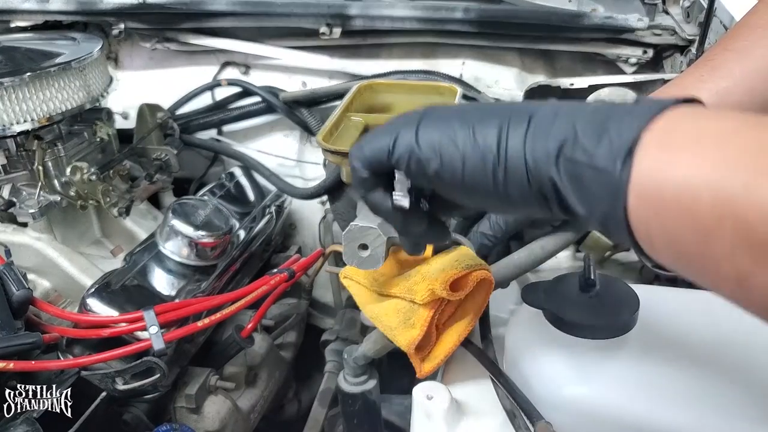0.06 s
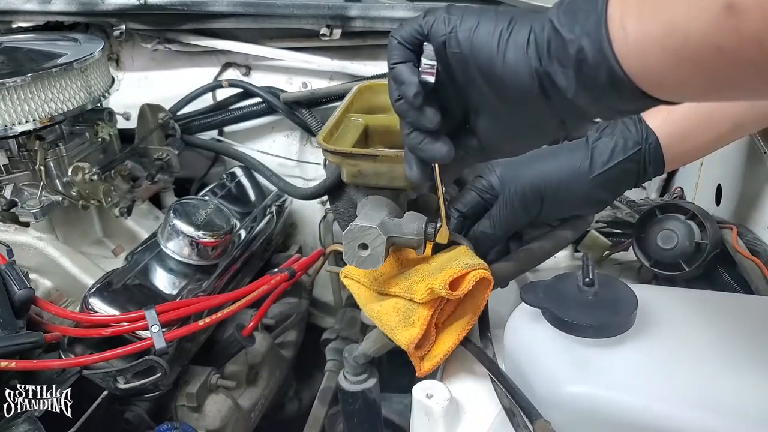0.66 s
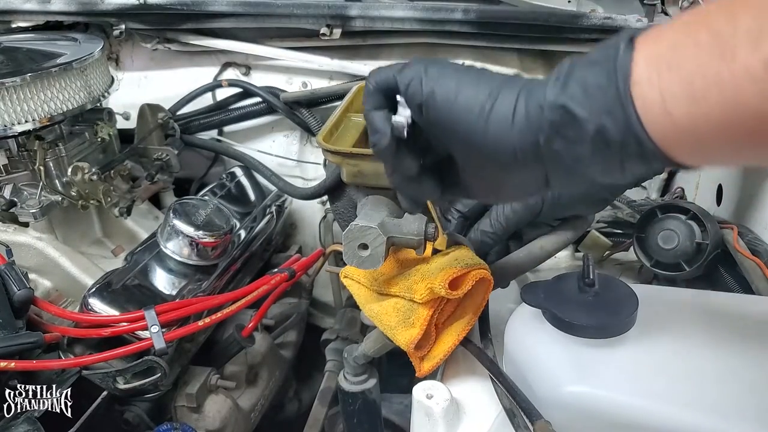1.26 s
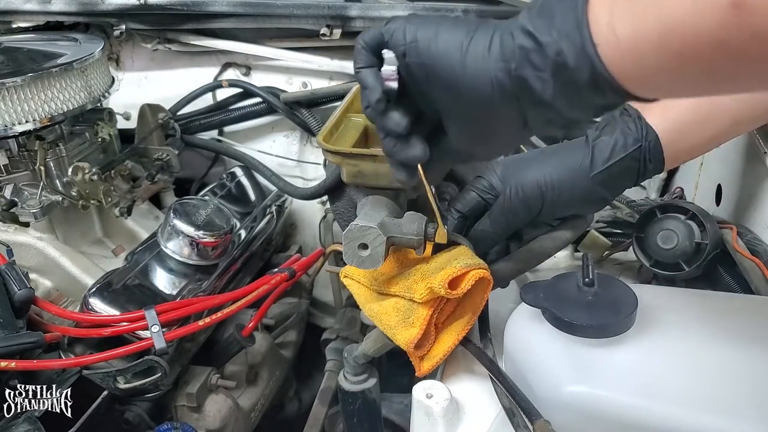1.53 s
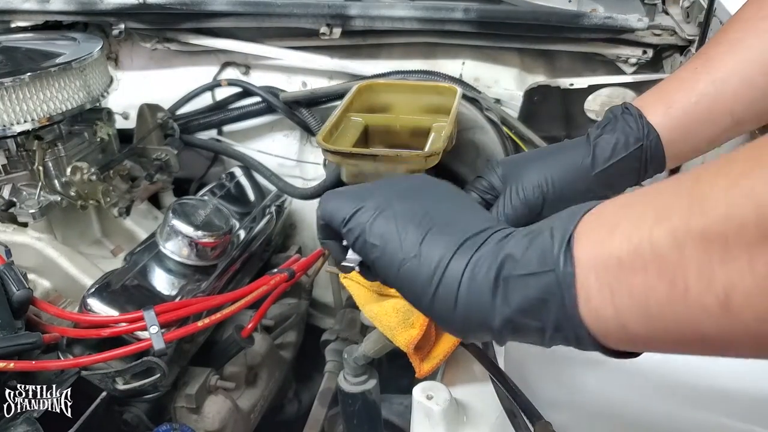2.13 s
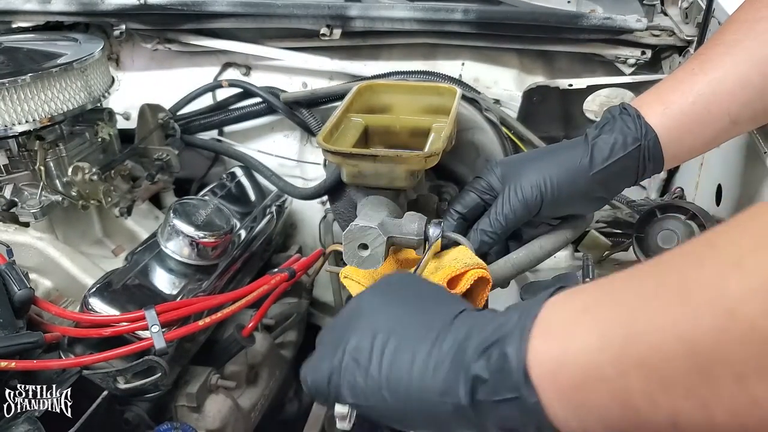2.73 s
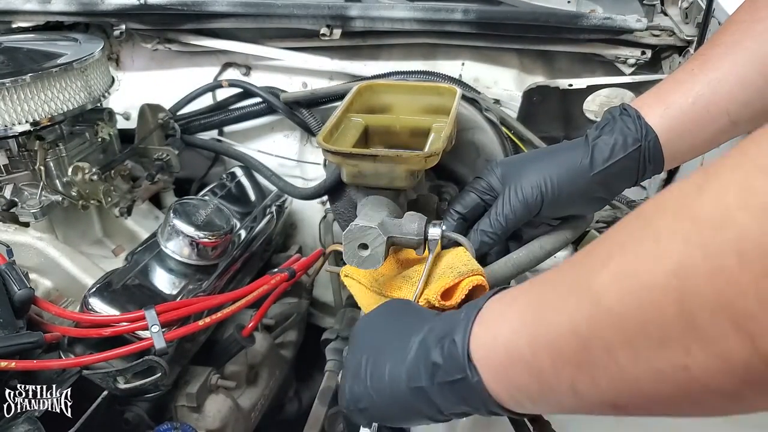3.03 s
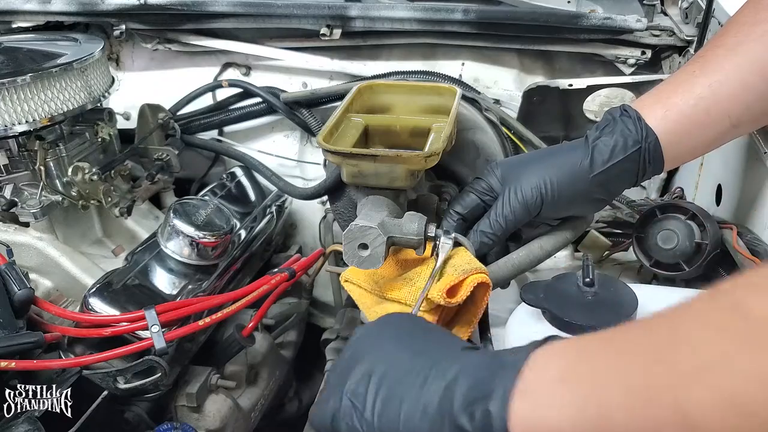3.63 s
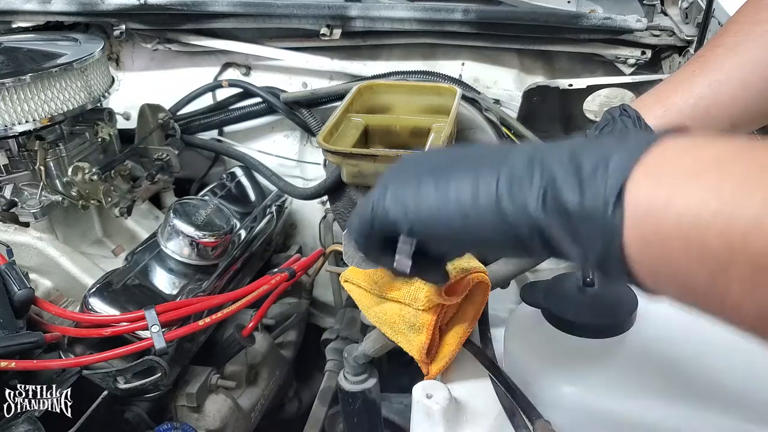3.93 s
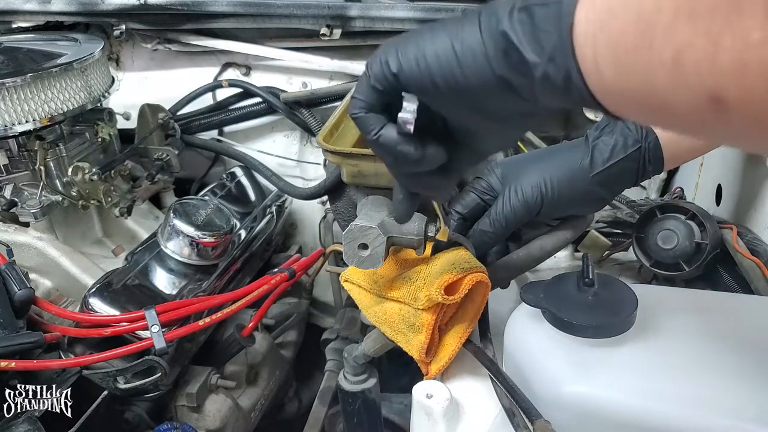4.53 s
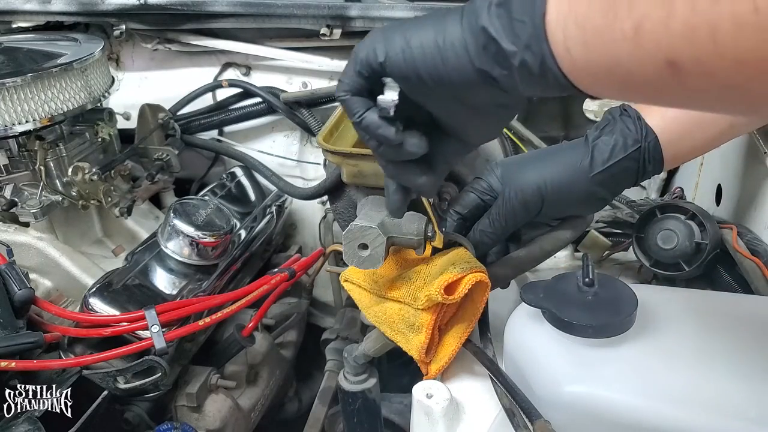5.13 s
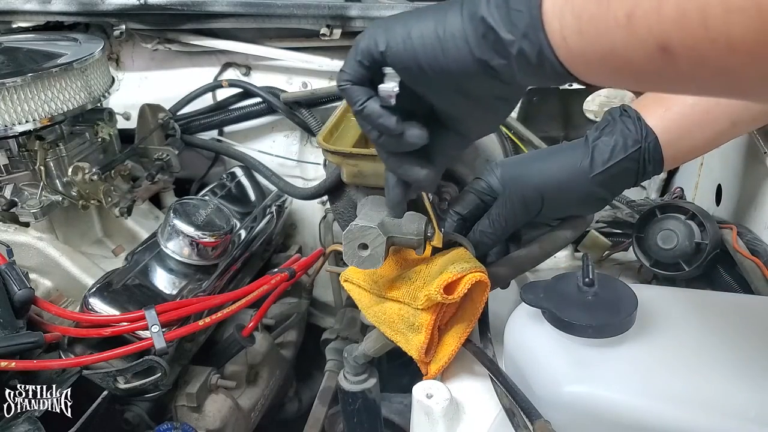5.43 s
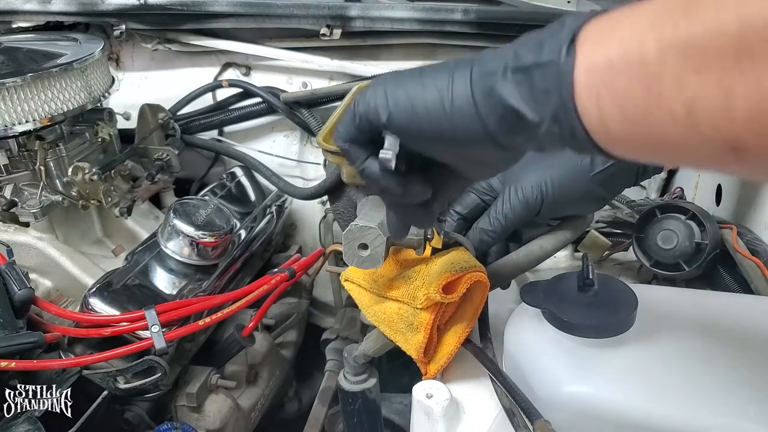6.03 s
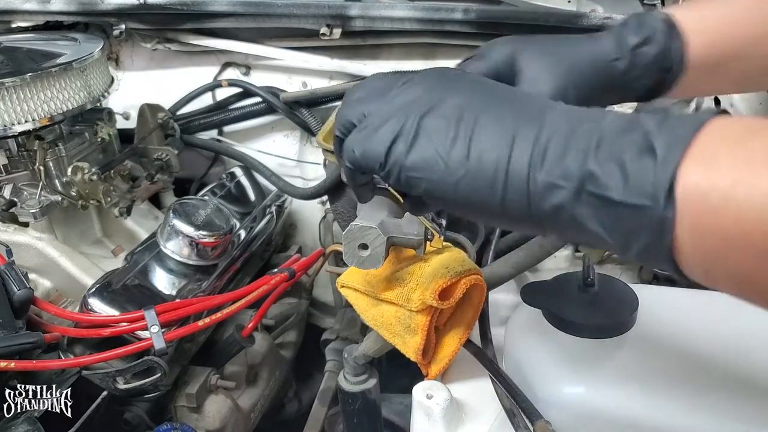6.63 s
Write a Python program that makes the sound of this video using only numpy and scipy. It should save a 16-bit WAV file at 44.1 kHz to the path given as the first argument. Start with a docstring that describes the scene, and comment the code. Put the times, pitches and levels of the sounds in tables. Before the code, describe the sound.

A steel wrench works a nut under a car hood, heard from just above the engine bay with a short garage echo. Light ringing taps fall in the first second, then chattering clicks at about 1 and 1.5 seconds, followed by duller knocks and soft low car body booms until 2.4 seconds. A rubber glove slides near 3 seconds, and the jaws scrape into a sharp click at 3.4. More clicks come around 3.9 and 4.1 seconds. At 4.2 seconds one hard, ringing metal clank is the loudest sound, with a low boom and faint thread grinding. Two lighter taps follow at 4.6 and 4.8 seconds. Muffled knocks and soft booms come between 5.5 and 6.5 seconds, and the gloves creak and slide briefly from 6.2 to 6.8. A faint low rumble and glove friction run underneath.

```python
"""An open-end wrench unscrews a loosened brake-line nut under a car hood in a garage.
Its jaws chatter onto the flats, tap and scrape the fitting, and once clank hard on the master cylinder.
Between strokes the nut grinds faintly, rubber gloves rub and creak, and the car body rumbles and booms
under the leaning arms. The microphone is just above the engine bay, with the garage ringing behind."""
import sys
import numpy as np
from scipy import signal
from scipy.fft import rfft, irfft, next_fast_len
from scipy.io import wavfile

SR = 44100
rng = np.random.default_rng(int(sys.argv[2]) if len(sys.argv) > 2 else 0)


def output_pcm(signal):
    """Save a mono or channel-first signal as 16-bit PCM at the path in sys.argv[1].

    Samples are clipped to [-1, 1] before scaling.
    """
    pcm = np.clip(np.atleast_2d(signal).T, -1, 1) * 32767
    wavfile.write(sys.argv[1], SR, np.round(pcm).astype(np.int16))


N = 298612
HIT_SIZE = 32768   # samples for one contact and its tail

# Car body resonances. Each row, as in all modes: pitch in Hz, width in Hz, lift in dB.
BODY_MODES = [(65.6, 15, 6), (110.8, 3.2, 11), (267, 26, 3), (360.3, 20, 3), (393.6, 8.2, 10.5),
              (498, 27, 6), (695, 12, 2.5)]
# Rubber rubbing on metal. Each row, as in all spectra: frequency in Hz, gain in dB.
GLOVE_SPECTRUM = [(300, -14), (2000, -0.5), (4500, 4), (6500, 12), (7500, 14), (11000, 9), (15000, 7.5),
                  (17000, 12)]
# Effort of the hands. Each row: time in seconds, body rumble and thread grind in relative dB.
EFFORT = [(0.0, -65.5, -64.5), (0.4, -66.5, -67.5), (1.05, -62.5, -74.5), (1.32, -68, -100),
          (1.55, -61.5, -78), (1.66, -58.5, -69), (2.06, -58, -72), (2.34, -66.5, -80),
          (2.58, -66.5, -81.5), (2.92, -66.5, -86.5), (4.15, -56.5, -52.5), (4.26, -50.5, -56),
          (4.43, -57.5, -71), (4.73, -69, -65), (5.24, -69, -74.5), (5.66, -58.5, -80), (5.92, -69.5, -88),
          (6.77, -71, -81.5)]


def from_db(db):
    """Decibels to gain."""
    return 10 ** (np.asarray(db) / 20)


def unit_rms(x):
    """Scale to rms 1."""
    return x / np.sqrt(np.mean(x ** 2) + 1e-20)


def in_time(rows):
    """Each column of a curve, at every sample."""
    times, *columns = np.transpose(rows)
    return [np.interp(np.arange(N) / SR, times, column) for column in columns]


def bins(size):
    """Frequencies of a spectrum in Hz."""
    return np.maximum(np.fft.rfftfreq(size, 1 / SR), 1)


def colour(spectrum, hz):
    """Gain of a spectrum, interpolated over log frequency."""
    at, db = np.transpose(spectrum)
    return from_db(np.interp(np.log(hz), np.log(at), db))


def causal(gain):
    """Minimum-phase filter with this gain: nothing sounds before the touch."""
    cepstrum = irfft(np.log(gain + 1e-9))
    half = len(cepstrum) // 2
    cepstrum[1:half] *= 2
    cepstrum[half + 1:] = 0
    return np.exp(rfft(cepstrum))


def resonances(modes, hz):
    """A chain of resonant peaks, each rising by its lift out of a flat response."""
    peaks = [1 + (from_db(lift) - 1) / (1 + 1j * (hz * hz - f * f) / (hz * width))
             for f, width, lift in modes]
    return np.prod(peaks, axis=0)


def band_mean(power, hz):
    """Average a power spectrum over a stretch that widens with frequency."""
    reach = 0.25 * hz + 60
    between = lambda running: np.interp(hz + reach, hz, running) - np.interp(hz - reach, hz, running)
    return between(np.cumsum(power)) / between(np.arange(len(hz)))


def stereo_noise(likeness, left_db, size=N):
    """White noise with a given likeness between the sides, louder on the left by left_db."""
    mid, side = rng.standard_normal((2, size))
    balance = unit_rms(from_db([[left_db / 2], [-left_db / 2]]))
    return balance * (np.sqrt(1 + likeness) * mid + np.sqrt(1 - likeness) * side * [[1], [-1]]) / np.sqrt(2)


def shaped(x, spectrum, modes=()):
    """Colour a long sound and pass it through resonances; rms 1."""
    size = next_fast_len(N, True)
    hz = bins(size)
    return unit_rms(irfft(rfft(x, size) * colour(spectrum, hz) * resonances(modes, hz), size)[:, :N])


def dying(power, t60):
    """Energy that fades by 60 dB in t60 seconds."""
    return signal.lfilter([1], [1, -np.exp(-np.log(1e6) / (t60 * SR))], power + 1e-18)


def chatter(longest_s, count=4):
    """Energy of a first touch and a few uneven rebounds."""
    power, turn = np.zeros(HIT_SIZE), np.linspace(0, 1, count)
    at = turn * longest_s * SR * 2 ** rng.uniform(-1.85, 0, count)
    touch_db = rng.normal(0, 6, count) - 1.5 * turn
    np.add.at(power, at.astype(int), from_db(touch_db) ** 2)
    return power / power.sum()


def cushion(edge_hz, hz):
    """Glove or rag lengthens a contact: treble above the edge falls; the knock and a faint tick stay."""
    knock_hz, db_per_octave, most_db = 357.3, 13.5, 35.5
    octaves = lambda f: np.log2(1 + (f / edge_hz) ** 2) / 2
    return from_db(-np.clip(db_per_octave * (octaves(hz) - octaves(knock_hz)), 0, most_db))


def path_to_microphone(power, direct_db, wet_db):
    """A contact arrives as a direct crack, quick engine bay reflections and the garage's tail."""
    bands_hz = [120, 360, 1500, 4500, 11000]   # band centres in Hz
    # The space, band by band. Each row: engine bay and garage t60 in seconds, relative echo in dB,
    # left-right likeness, lean to the left in dB.
    space = [(0.51, .65, -7.5, 0.96, 0.8), (0.22, 0.47, -9, 0.82, 2.5), (0.079, 0.48, -10, 0.028, 5),
             (0.066, 0.5, -15.5, 0.037, 9), (0.033, 0.36, -17.5, .05, 4.5)]
    hz, out = bins(HIT_SIZE), 0
    crack = from_db(direct_db) ** 2 * dying(power, t60=0.004)
    for band, (bay_t60, garage_t60, echo_db, likeness, _) in zip(np.eye(len(bands_hz)), space):
        energy = crack + dying(power, bay_t60) + from_db(echo_db + wet_db) ** 2 * dying(power, garage_t60)
        arrivals = stereo_noise(likeness, left_db=0, size=HIT_SIZE) * np.sqrt(energy)
        out = out + rfft(arrivals) * np.sqrt(np.interp(np.log(hz), np.log(bands_hz), band))
    # equal energy at all pitches, with more of the treble on the left
    even = [side * causal(band_mean(abs(side) ** 2, hz) ** -.5) for side in out]
    left = colour([(f, row[-1]) for f, row in zip(bands_hz, space)], hz)
    return even * np.array([left, np.ones_like(left)]) * np.sqrt(2 / (1 + left ** 2))


def blows(contacts, spectrum, modes, gain_db, direct_db, wet_db, vary_db, low_cut_hz):
    """Steel contacts ring the struck part and the car body that holds it.
    Each contact row: start and longest chatter in seconds, relative force in dB, cushion edge in Hz."""
    hz, out = bins(HIT_SIZE), np.zeros((2, N + HIT_SIZE))
    body = resonances(BODY_MODES, hz) * causal(1 / (1 + (low_cut_hz / hz) ** 4))
    fade_out = np.minimum(np.linspace(2, 0, HIT_SIZE), 1) ** 2
    for start_s, chatter_s, force_db, edge_hz in contacts:
        contact = from_db(force_db) * causal(colour(spectrum, hz) * cushion(edge_hz, hz))
        # every point of contact favours other modes
        part = resonances([(f, width, rng.normal(lift, vary_db)) for f, width, lift in modes], hz)
        path = path_to_microphone(chatter(chatter_s), direct_db, wet_db)
        start = int(start_s * SR)
        out[:, start:start + HIT_SIZE] += irfft(path * contact * part * body) * fade_out
    return from_db(gain_db) * out[:, :N]


def grains(per_s, spread_db, t60):
    """Friction envelope made of tiny slips of uneven size."""
    slipping = rng.random(N) < per_s / SR
    sizes = from_db(spread_db * np.minimum(rng.exponential(1, N), 4))
    return np.sqrt(dying(slipping * sizes ** 2, t60))


def rasps(strokes, spectrum, modes, wet_db):
    """Stick and slip: nearly regular snaps swell and fade over each stroke, with the garage's tail.
    Each stroke row: start and end in seconds, slips per second, level in dB."""
    power = np.zeros(N)
    for start, end, per_s, level_db in strokes:
        slips = np.arange(start, end, 1 / per_s)
        unevenness, jitter = rng.standard_normal((200, 2))[:len(slips)].T
        swell = np.sin(np.pi * (slips - start) / (end - start)) * from_db(level_db + 2.3 * unevenness)
        at = np.clip((slips + 0.036 * jitter / per_s) * SR, 0, N - 1).astype(int)
        np.add.at(power, at, swell ** 2)
    energy = dying(power, t60=0.046) + from_db(wet_db) ** 2 * dying(power, t60=0.55)
    noise = stereo_noise(likeness=0.19, left_db=7.6) * np.sqrt(energy)
    return np.sqrt(np.mean(energy)) * shaped(noise, spectrum, modes)


def body_rumble():
    """Leaning arms shake the car body, low and near the centre."""
    spectrum = [(20, -16), (45, -9), (70, 2.5), (110, -6.5), (160, -11), (300, -23), (900, -58)]
    modes = [(69.13, 3.2, 3.1), (108.0, 10, 1)]
    level_db, _ = in_time(EFFORT)
    return from_db(level_db + 1.5) * shaped(stereo_noise(likeness=0.93, left_db=1), spectrum, modes)


def thread_grind():
    """The turning thread slips in tiny grains that sound through the car body."""
    spectrum = [(100, -13.5), (300, -5), (500, -2.5), (1000, -17.5), (3500, -14), (8000, -34)]
    _, level_db = in_time(EFFORT)
    friction = grains(per_s=210, spread_db=2.2, t60=0.12) * stereo_noise(likeness=0.2, left_db=2.5)
    return from_db(level_db - 1) * shaped(friction, spectrum, BODY_MODES)


def glove_rub():
    """Gloves brush the metal: a fine, bright friction to the left."""
    # Each row: time in seconds, relative level in dB.
    rubbing = [(0.0, -81), (0.19, -83), (0.89, -82), (1.24, -89), (2.04, -84), (2.6, -86.5), (2.96, -74.5),
               (3.24, -85), (4.15, -71.5), (4.39, -88), (4.94, -90.5), (5.45, -93), (5.58, -91),
               (6.77, -80.5)]
    level_db, = in_time(rubbing)
    friction = grains(per_s=1000, spread_db=1.3, t60=0.025) * stereo_noise(likeness=0, left_db=7.2)
    return from_db(level_db + 18) * shaped(friction, GLOVE_SPECTRUM)


def wrench_taps():
    """Glancing touches leave the wrench free to ring."""
    contacts = [(0.037, 0.0094, -5.5, 9150), (0.6125, 0.0061, 3.5, 7600), (0.939, 0.0069, -9.5, 4520),
                (4.178, 0.0017, -2.5, 8300), (4.508, 0.0041, -25.5, 21200), (4.6085, .0055, -3.5, 8500),
                (4.777, 0.012, 2.5, 7700)]
    spectrum = [(120, -2), (360, 1), (1500, -4.5), (4500, -1), (11000, -9)]
    modes = [(368, 18, 8.8), (1969, 110, 4.8), (2048, 130, 6.9), (3558, 200, 10), (4100, 310, 8.4),
             (6157, 210, 10), (11300, 200, 8.9), (13060, 410, 8.1)]
    return blows(contacts, spectrum, modes, gain_db=-1, direct_db=2, wet_db=-3, vary_db=0.7, low_cut_hz=54)


def jaw_seatings():
    """The jaws chatter onto the nut's flats, some bare and bright, some cushioned and dull."""
    contacts = [(1.007, 0.0073, 8, 4180), (1.506, .012, 10.5, 8000), (1.613, 0.0062, 4.5, 2700),
                (1.72, 0.0023, 3.5, 700), (2.124, .003, 12, 520), (2.162, .006, 0.5, 200),
                (2.393, 0.02, -5, 200), (3.174, 0.0016, -10.5, 1710), (3.388, 0.013, 6, 1830),
                (3.407, 0.0012, 10.5, 3900), (3.722, .008, -2, 800), (3.779, 0.012, -4.5, 7130),
                (3.884, .004, -3, 712), (3.9035, .006, 8, 7000), (4.0565, .003, 15.5, 12860),
                (5.494, .003, 1.5, 200), (5.647, .013, -11.5, 201), (5.801, .016, -9, 150),
                (6.515, .028, -10, 397)]
    spectrum = [(120, -1.5), (270, 0.5), (600, -1.5), (1300, -4), (2100, -4), (4500, -4), (11000, -3)]
    modes = [(600, 67, 3.4), (761, 27, 4.5), (1275, 56, 9.2), (1427, 42, 7), (1840, 44, 5.4),
             (1964, 65, 7.2), (2390, 74, 4.4), (2580, 45, 2.4), (3110, 100, 4.1), (3503, 190, 12),
             (4030, 62, 5.1), (4370, 110, 5.3), (4890, 59, 11), (5330, 31, 6.2), (6127, 69, 5),
             (6600, 79, 9.1), (9400, 300, 2.3), (12860, 250, 6), (14500, 600, 2.9)]
    return blows(contacts, spectrum, modes,
                 gain_db=-2, direct_db=-1.5, wet_db=-0.5, vary_db=1, low_cut_hz=53.3)


def panel_booms(pitch_hz=68.2, t60=0.45, push_s=0.026):
    """Shifting weight softly pushes hood and fender and sets their lowest mode swinging."""
    # Each row: start in seconds, level in dB.
    pushes = [(1.512, -38), (1.891, -37), (2.122, -41), (4.225, -42), (5.6, -49.5), (5.809, -52),
              (6.421, -48.5)]
    out = 0
    for start, level_db in pushes:
        age = np.maximum(np.arange(N) / SR - start, 0)
        envelope = from_db(level_db - 60 * age / t60) * np.minimum(age / push_s, 1)
        out = out + envelope * np.sin(2 * np.pi * pitch_hz * age)
    return out


def jaw_scrapes():
    """The jaws drag over the nut, catching and ringing."""
    strokes = [(3.093, 3.125, 180, -66), (3.15, 3.24, 100, -60), (3.24, 3.32, 104, -66.5),
               (3.33, 3.385, 260, -57), (3.378, 3.44, 540, -41.5), (1.69, 1.75, 200, -54),
               (3.765, 3.81, 230, -59), (4.035, 4.058, 200, -53)]
    spectrum = [(200, -12.5), (650, 6), (2400, -12.5), (4000, -16.5), (9000, -17.5)]
    modes = [(800, 69, 15), (1160, 120, 6.5), (1820, 150, 4), (2260, 85, 26), (3540, 160, 21)]
    return rasps(strokes, spectrum, modes, wet_db=-17)


def glove_slides():
    """A glove slides to a new grip, with hardly any room on it."""
    strokes = [(2.98, 3.04, 400, -59), (3.06, 3.16, 81, -74), (3.48, 3.66, 300, -63),
               (6.51, 6.64, 400, -57)]
    return rasps(strokes, GLOVE_SPECTRUM, modes=[], wet_db=-28)


def cylinder_clank():
    """One hard blow rings the master cylinder's casting and carries into the garage."""
    contacts = [(4.2103, .002, 18.32, 12180)]
    spectrum = [(120, 4), (360, -6.5), (1500, 7), (4500, 1), (11000, -4.5)]
    modes = [(500, 18, 3.1), (715, 18, 5.4), (956.3, 12, 1.2), (1220, 36, 7.8), (1412.5, 80, 11),
             (1485, 42, 3.9), (1530, 24, 1.6), (1890, 47, 5.3), (2260, 68, 11), (2383, 33, 9.1),
             (2310, 73, 3), (2549, 31, 2), (2450, 30, 4.1), (3070, 14, 4.9), (3300, 40, 5), (4200, 57, 3.3),
             (4900, 69, 5.5), (6440, 420, 3)]
    return blows(contacts, spectrum, modes,
                 gain_db=-2, direct_db=12, wet_db=3.5, vary_db=0.5, low_cut_hz=78.4)


def glove_creaks():
    """Rubber sticks and slips on the wrench shank."""
    strokes = [(6.19, 6.31, 83, -54), (6.69, 6.76, 61.1, -64)]
    spectrum = [(300, -19), (1400, -8.5), (2000, -4), (3000, -9.5), (9000, -10.5)]
    modes = [(2090, 160, 14.3), (4120, 490, 8.6), (6400, 630, 13.4)]
    return rasps(strokes, spectrum, modes, wet_db=-19)


def scene():
    """All contacts and friction, heard from just above the engine bay."""
    steel = jaw_seatings() + wrench_taps() + cylinder_clank() + jaw_scrapes()
    grip = glove_creaks() + glove_slides()
    return steel + grip + panel_booms() + body_rumble() + thread_grind() + glove_rub()


def record(dry, hiss_db=-79, cutoff_hz=16200):
    """The microphone is dull above 7 kHz and hisses faintly; the top is cut."""
    microphone_spectrum = [(20, 5), (6500, -3.5), (7000, -8.5), (7500, -22), (8400, -11), (11000, -14.5),
                           (14000, -5.5), (16000, -13.5)]
    hiss_spectrum = [(120, -41.5), (200, -9.5), (1710, -16.5), (5130, -24.5), (6520, -11.5), (7410, -26.5),
                     (11500, -23.5), (12800, -46.5), (14300, -14), (16000, -39)]
    hiss_modes = [(6460, 580, 9.4)]
    size = next_fast_len(N // 2 + HIT_SIZE, True) * 2
    heard = irfft(rfft(dry, size) * causal(colour(microphone_spectrum, bins(size))))[:, :N]
    hiss = from_db(hiss_db) * shaped(stereo_noise(likeness=0.08, left_db=4.9), hiss_spectrum, hiss_modes)
    top_cut = signal.ellip(10, .1, 80, cutoff_hz, fs=SR, output="sos")
    return signal.sosfilt(top_cut, np.clip(heard + hiss, -1, 1))


dry = scene()
out = record(dry)
output_pcm(out)
```